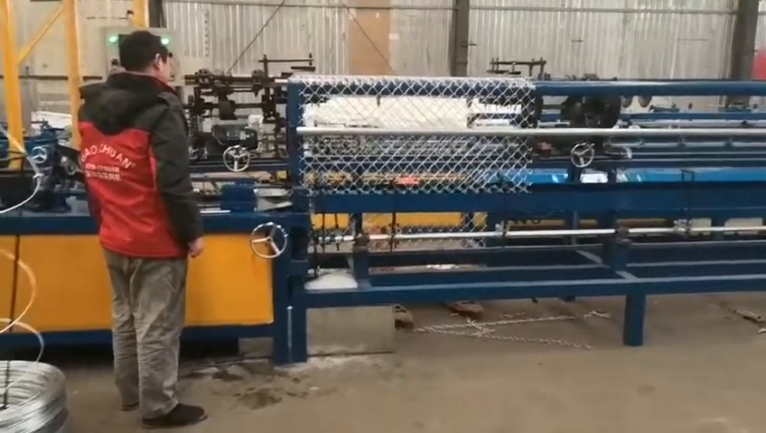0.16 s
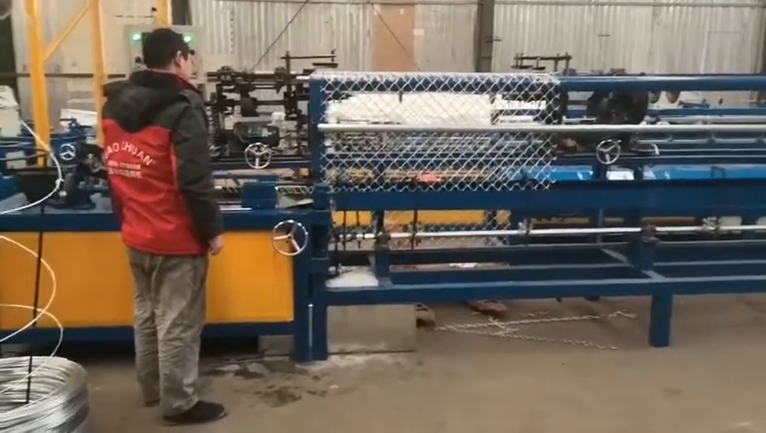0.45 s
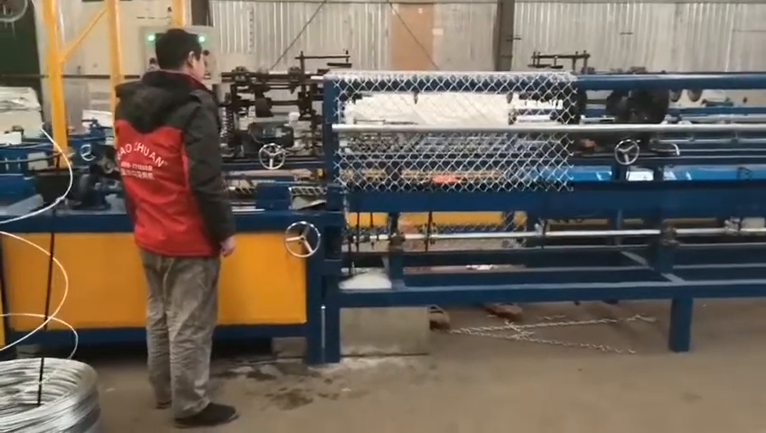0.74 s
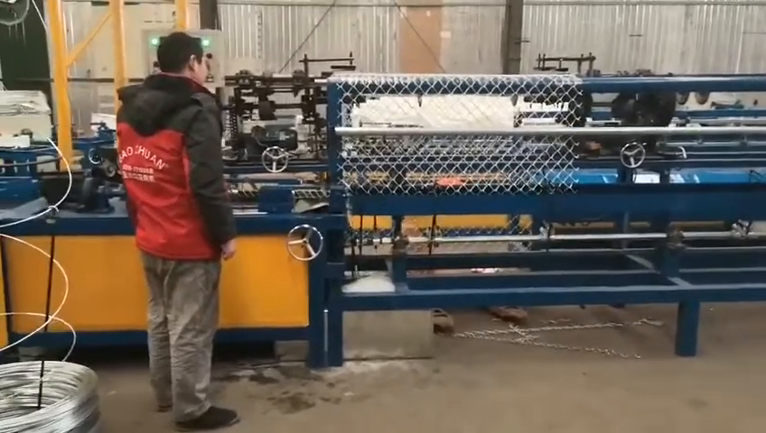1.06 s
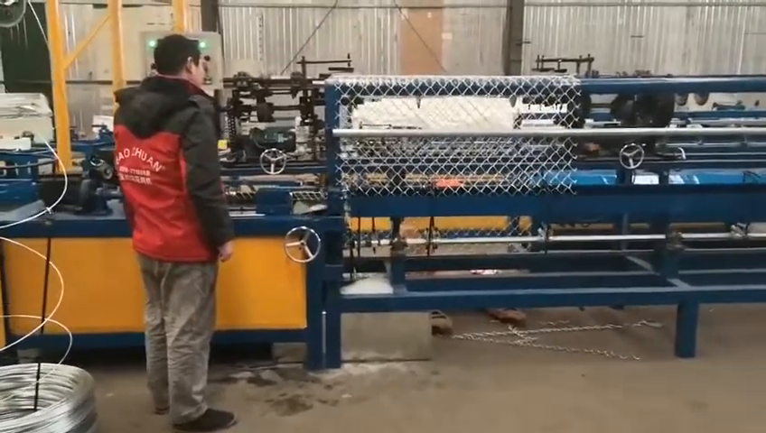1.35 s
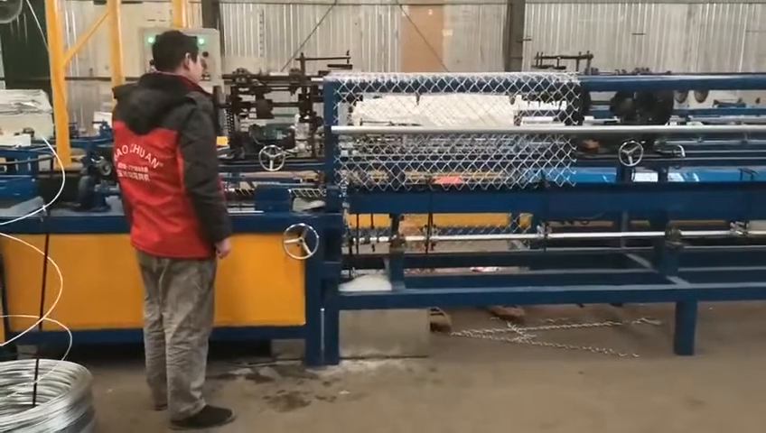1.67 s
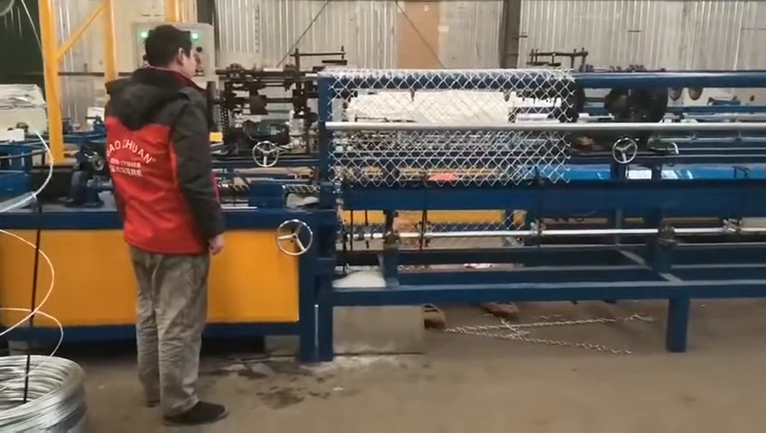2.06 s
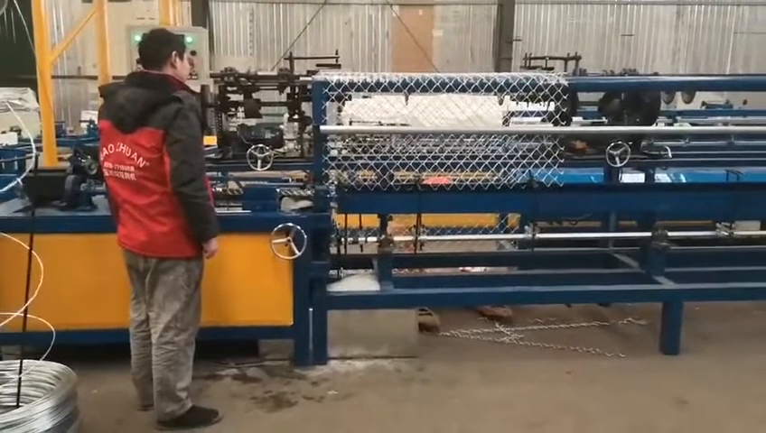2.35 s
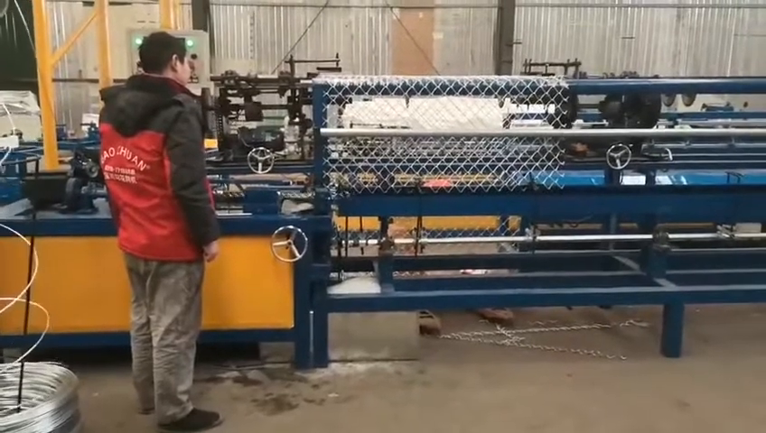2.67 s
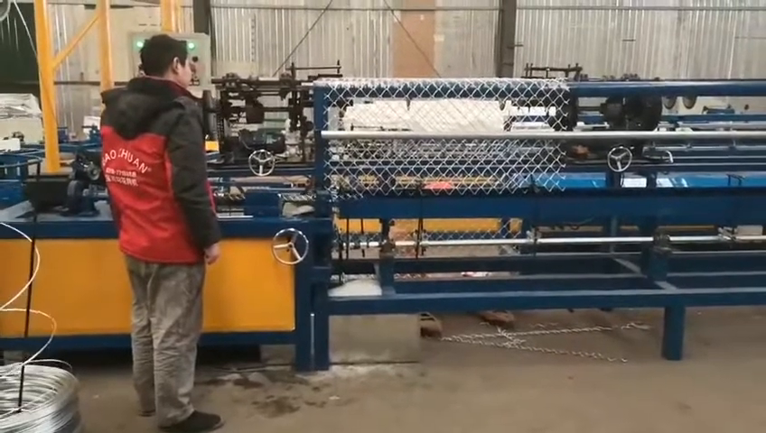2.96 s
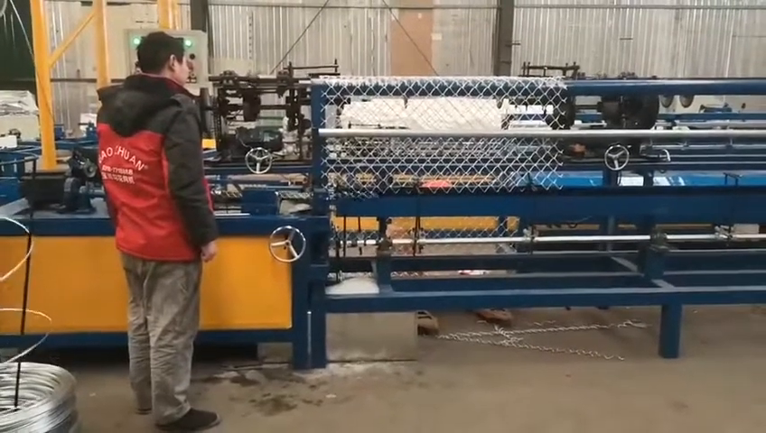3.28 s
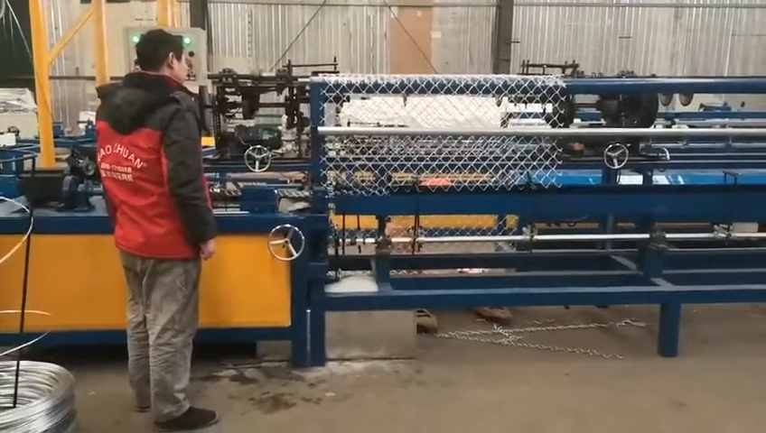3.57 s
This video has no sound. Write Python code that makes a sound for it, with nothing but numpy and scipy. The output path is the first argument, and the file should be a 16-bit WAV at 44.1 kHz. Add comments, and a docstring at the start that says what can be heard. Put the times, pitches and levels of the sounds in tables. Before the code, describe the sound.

A wire fence weaving machine hisses and rattles, slams once heavily, then hums and clanks.

```python
"""A large sheet-metal workshop, a few metres from a chain-link weaving machine, on a two-port microphone.
Air and wire guides hiss (shaped noise), shafts rumble and roar (noise bands) over steady motor tones.
Wires sing on the guides as sagging tones and loose parts rattle in the frame as ticks into resonances.
A heavy part slams and rebounds, and the hall rings on, each band dying at its own pace; after the slam
a gear hum glides up to speed as the drive starts, and a steel part clanks as chatter into its modes."""
import sys
import numpy as np
from scipy import signal
from scipy.fft import rfft, irfft
from scipy.io import wavfile

SR = 44100
rng = np.random.default_rng(int(sys.argv[2]) if len(sys.argv) > 2 else 0)


def inscribe(sig):
    """Save sig as 16-bit PCM at rate SR to the path in sys.argv[1].

    A 1-D sig is mono; a 2-D sig holds one channel per row.
    Samples are clipped to [-1, 1] before scaling.
    """
    pcm = np.round(np.clip(np.atleast_2d(sig).T, -1, 1) * 32767)
    wavfile.write(sys.argv[1], SR, pcm.astype(np.int16))


N = 164052  # length [samples]

# colour of the guides' hiss, also of the slam's crack: (pitch [Hz], density [dB per Hz])
HISS_COLOUR = [(2800, -4), (3300, -8), (3680, -3.5), (4790, -5.5), (5820, -2), (6730, -7.5), (7800, -2),
               (8400, -10), (9600, -14.5)]
# machine at work, before the lifts in rattle() and roar(): (time [s], rattle level [dB], low roar level [dB])
WORK_LEVELS = [(0, -22, -38), (.12, -27.5, -37.5), (1.2, -26.5, -39), (1.55, -27.5, -44.5),
               (1.85, -26.5, -43), (2.08, -24, -38.5), (2.6, -24.5, -40.5), (2.66, -24.5, -33.5),
               (2.85, -22, -39.5), (3.25, -23, -36.5), (3.41, -25.5, -40), (3.5, -20, -35.5),
               (3.72, -23, -36)]


def amp(db):
    """Decibels to amplitude factor."""
    return 10 ** (np.asarray(db) / 20)


def rms_one(x):
    """Scales a signal to rms 1."""
    return x / np.sqrt(np.mean(x ** 2) + 1e-20)


def seconds():
    """Time of every sample [s]."""
    return np.arange(N) / SR


def in_time(rows):
    """Draws each column of a timed table as a curve over the whole scene."""
    times, *columns = np.transpose(rows)
    return [np.interp(seconds(), times, column) for column in columns]


def at_hz(points, hz):
    """Reads a table at any pitch, straight between points on a log pitch axis."""
    pitches, values = np.array(points).T
    return np.interp(np.log(hz), np.log(pitches), values)


def drift(rate_hz):
    """Slow chance of rms 1: noise through two equal low-pass poles at rate_hz."""
    step = 40  # samples between drawn values
    r = np.exp(-2 * np.pi * rate_hz * step / SR)
    noise = rng.standard_normal(N // step + 2002)
    slow = signal.lfilter([1], [1, -2 * r, r * r], noise)[2000:]  # drop the filter's settling
    return np.interp(np.arange(N) / step, np.arange(len(slow)), rms_one(slow))


def resonance(x, hz, width_hz):
    """Two-pole resonance, gain about 1 on top."""
    r = np.exp(-np.pi * width_hz / SR)
    poles = [1, -2 * r * np.cos(2 * np.pi * hz / SR), r * r]
    return signal.lfilter([(1 - r * r) / 2, 0, (r * r - 1) / 2], poles, x + 1e-18)


def coloured(x, spectrum):
    """Gives a signal the colour of a spectrum table, falling off steeply beyond its ends."""
    hz = np.maximum(np.fft.rfftfreq(N, 1 / SR), 1)
    above_low_end = 1 / (1 + (spectrum[0][0] / hz) ** 12)
    below_high_end = 1 / (1 + (hz / spectrum[-1][0]) ** 12)
    return irfft(rfft(x) * amp(at_hz(spectrum, hz)) * above_low_end * below_high_end, N)


def banded_noise(spectrum, flicker_db, shape=lambda hz: 1):
    """Flickering stereo noise in half-octave bands, scaled for rms 1 before each band's envelope."""
    # how alike the two ports hear: (pitch [Hz], left-right likeness [-1 to 1])
    likeness = [(60, .999), (160, .97), (270, 0.9), (440, 0.2), (600, 0.32), (1200, 0.06), (2000, 0.25)]
    edges = 20 * 2 ** np.arange(0, 10, .5)
    edges = edges[(edges > spectrum[0][0] / np.sqrt(3)) & (edges < spectrum[-1][0] * np.sqrt(3))]
    white = coloured(rng.standard_normal((2, 2, N)), spectrum)
    shared_drift = drift(12.8)
    out, power = 0, 0
    for k, (low, high) in enumerate(zip(edges, edges[1:])):
        band_pass = signal.butter(2, [low, high], "band", fs=SR, output="sos")
        mid, side = signal.sosfilt(band_pass, white[k % 2])  # neighbours use different noise
        hz = np.sqrt(low * high)
        alike = np.clip(at_hz(likeness, hz), -1, 1)
        stereo = np.sqrt(1 + alike) * mid + np.sqrt(1 - alike) * side * [[1], [-1]]
        # the level flickers within twice flicker_db, partly together with the other bands
        flicker = np.tanh(shared_drift / 2 + drift(14.0) / 2) * 2
        band = amp(flicker_db * flicker) * stereo
        out = out + band * shape(hz)
        power = power + np.mean(band ** 2)
    return out / np.sqrt(power)


def motor():
    """Steady low tones whose levels waver a little."""
    # steady motor tones: (pitch [Hz], level [dB] about which each wavers)
    motor_lines = [(50, -47), (120, -45), (175, -43)]
    out = 0
    for hz, db in motor_lines:
        level = amp(db + 1.0 * drift(3.2))
        out = out + level * np.sqrt(2) * np.sin(2 * np.pi * hz * seconds())
    return out


def rumble():
    """Shafts rumble: low noise bands with a slow course of level."""
    # colour of the rumble: (pitch [Hz], density [dB per Hz])
    rumble_colour = [(22, 5), (36, -18), (50, -4.5), (75, -5), (134, -3), (183, -2), (230, -4), (320, -7.5)]
    # its course before a 2 dB lift: (time [s], level [dB])
    rumble_level = [(0, -37.5), (1.6, -37), (2.2, -33), (3.72, -36)]
    return amp(in_time(rumble_level)[0] + 2.0) * banded_noise(rumble_colour, flicker_db=1.04)


def air():
    """Faint top of the hiss: shaped noise whose level drifts."""
    # colour of the faint top: (pitch [Hz], density [dB per Hz])
    air_colour = [(9600, -20), (11000, 0.5), (12000, -8), (16000, -7)]
    # course about which it drifts: (time [s], level [dB])
    air_level = [(0, -46.5), (3.72, -53)]
    noise = rms_one(coloured(rng.standard_normal((2, N)), air_colour))
    return amp(in_time(air_level)[0] + 1.2 * drift(7.0)) * noise


def hiss():
    """Air and wire guides hiss: flickering treble noise bands."""
    # course of the treble hiss: (time [s], level [dB])
    hiss_level = [(0, -24.5), (1.3, -25), (1.9, -23.5), (2.5, -22), (3.1, -24), (3.43, -24.5), (3.72, -24)]
    return amp(in_time(hiss_level)[0]) * banded_noise(HISS_COLOUR, flicker_db=1.22)


def roar():
    """Low roar of the machine at work: flickering noise bands."""
    # colour of the roar: (pitch [Hz], density [dB per Hz])
    roar_colour = [(260, -4.5), (390, -5.5), (590, -14.5), (950, -4), (1250, -3.5)]
    _, roar_db = in_time(WORK_LEVELS)
    return amp(roar_db + 6) * banded_noise(roar_colour, flicker_db=2.0)


def hum():
    """Gear mesh tone gliding exponentially up to speed, with a rough skirt of resonant noise."""
    # course of the tone: (time [s], level [dB])
    hum_level = [(1.75, -64), (1.86, -34), (1.97, -28.5), (2.04, -30), (2.09, -19), (2.13, -28),
                 (2.38, -25.5), (2.71, -29), (2.75, -17), (2.79, -33), (2.97, -23), (3.02, -30),
                 (3.06, -21.5), (3.16, -26.5), (3.27, -23.5), (3.35, -29), (3.6, -24.5), (3.72, -29)]
    full_hz, start_hz, start_s, run_up_s = 230, 201.8, 1.8, 0.0996
    rough_db, rough_hz, rough_width_hz = -5, 226, 50  # level against the tone; width of each of two passes
    t = seconds()
    hz = full_hz - (full_hz - start_hz) * np.exp(-np.maximum(t - start_s, 0) / run_up_s)
    tone = np.sqrt(2) * np.sin(2 * np.pi * np.cumsum(hz) / SR)
    rough = resonance(rng.standard_normal(N), rough_hz, rough_width_hz)
    rough = rms_one(resonance(rough, rough_hz, rough_width_hz))
    sounding = t > hum_level[0][0]
    return amp(in_time(hum_level)[0]) * (tone + amp(rough_db) * rough) * sounding


def singing():
    """Wires on the guides swell and fade on sagging tones; the rough skirt differs at each port."""
    # each wire's song: (start time [s], length [s], level [dB] at full swell)
    songs = [(0, 0.1, -29), (0, 0.67, -39), (.85, 0.323, -32), (0.95, 0.392, -30.5), (1.1, 0.29, -34.5),
             (1.382, 0.76, -30.5), (2.15, 0.2, -35.5), (1.93, 0.23, -25.5), (2.2, 0.53, -31.5),
             (1.86, 0.1, -28), (2.351, 0.38, -32.5), (2.4, 0.57, -28.5), (2.429, 0.18, -28),
             (2.549, 0.69, -34), (2.72, .12, -29), (2.76, 0.3, -32.5), (2.76, 0.091, -24.5),
             (2.85, 0.54, -31), (2.852, 0.14, -28.5), (3.08, 0.19, -26), (3.08, 0.29, -27),
             (3.05, 0.25, -28), (3.05, 0.46, -28), (3.24, 0.11, -28), (3.481, 0.17, -27), (3.55, 0.18, -30),
             (3.5, 0.22, -32)]
    # pitch of each song halfway through, in the same order: one column (pitch [Hz])
    song_pitches = [1492, 7715, 1550, 1425, 2060, 1428, 1990, 2004, 1403, 1420, 1812, 2107, 1975, 1243,
                    2205, 2045, 1925, 1765, 2415, 1915, 2030, 2195, 1495, 2425, 1910, 2035, 2180]
    width_hz, rough_db, sag_hz_per_s = 26, -1.5, 35
    peak_at = 0.55  # share of the length; full swell spans from half this to halfway through the rest
    r = np.exp(-np.pi * width_hz / SR)
    out, t = np.zeros((2, N)), seconds()
    for hz, (start, length, db) in zip(song_pitches, songs):
        part = slice(int(start * SR), min(int((start + length) * SR), N))
        u = (t[part] - start) / length  # 0 to 1 through the song
        ramp = np.minimum(u / peak_at, (1 - u) / (1 - peak_at))
        swell = np.sin(np.pi / 2 * np.clip(ramp * 2, 0, 1))
        slow = signal.lfilter([1], [1, -2 * r, r * r], rng.standard_normal((2, 2, SR)))
        in_phase, across = rms_one(slow)[..., -len(u):]
        phase = 2 * np.pi * np.cumsum(hz - sag_hz_per_s * length * (u - .5)) / SR
        rough = in_phase * np.sin(phase) + across * np.cos(phase)
        tone = np.sqrt(2) * np.sin(phase) + amp(rough_db) * rough
        out[:, part] += amp(db) * swell * rms_one(tone)
    return out


def clanks():
    """A short dying chatter drives the modes of a steel part, with a dull crack and a hall tail."""
    # blows: (time [s], chatter decay [s], low, middle and high mode drive [dB])
    blows = [(3.161, 0.02, -26.5, -26.5, -26.5), (3.222, 0.015, -31, -28, -26.5),
             (3.329, 0.0094, -22.5, -34, -23.5), (3.454, 0.032, -26, -26.5, -26),
             (3.484, 0.051, -31.5, -31, -29), (3.563, 0.02, -27, -30, -34), (3.615, 0.012, -36, -30, -29.5),
             (3.632, .01, -24.5, -32, -23), (3.643, 0.0067, -20, -15, -21.5)]
    # low, middle and high modes of the part, each a list of: (pitch [Hz], width [Hz], relative level [dB])
    steel_modes = [
        [(3660, 110, 0), (3815, 90, -5)],
        [(4700, 600, -5), (5680, 400, 0)],
        [(6830, 330, 0), (7470, 280, -3), (7900, 280, -3)],
    ]
    crack_db, hall_db, hall_t60_s = 1, -12, 0.6
    detune, attack_s = .006, .001  # each mode rings a little off pitch at each blow (spread as a share)
    crack_hz, crack_width_hz = 5100, 3400
    out, t = np.zeros((2, N)), seconds()
    for start, length, *group_db in blows:
        first = int(start * SR)
        part = slice(first, min(first + SR // 2, N))
        age = t[part] - start
        chatter = np.exp(-age / max(length, .002))
        hall = amp(hall_db - 60 * age / hall_t60_s) * (1 - np.exp(-age / 0.0019))
        burst = rng.standard_normal((2, SR // 2))[:, :len(age)]
        burst = burst * (chatter + hall) * np.minimum(age / attack_s, 1)
        crack = resonance(resonance(burst, crack_hz, crack_width_hz), crack_hz, crack_width_hz)
        out[:, part] += amp(crack_db + np.mean(group_db)) * crack
        for db, modes in zip(group_db, steel_modes):
            for hz, width_hz, level_db in modes:
                hz = hz * (1 + detune * rng.standard_normal())
                ring = resonance(resonance(burst, hz, width_hz), hz, 3 * width_hz)
                # narrow modes let less noise through, so they are raised
                out[:, part] += amp(db + level_db) * ring * np.sqrt(SR / width_hz)
    return out


def rattle():
    """Loose parts: dense uneven ticks of wire on steel ring frame modes, over a smooth reverberant part."""
    # colour of the rattle: (pitch [Hz], density [dB per Hz])
    rattle_colour = [(750, -36), (1150, -9), (1440, 2.5), (1780, -1), (2100, 2), (2700, -0.5), (3500, -4.5)]
    ticks_per_s, mode_q, spread_db = 900, 88, 2
    ticks_db, smooth_db = -4, -3  # shares of the two parts
    heights = amp(spread_db * np.minimum(rng.exponential(1, (2, N)), 5))
    ticks = heights * rng.choice([-1, 1], (2, N))
    ticks = ticks * (rng.random((2, N)) < ticks_per_s / SR)
    pitches = np.geomspace(800, 3400, num=24)
    mode_hit = rng.integers(0, 24, (2, N))  # each tick strikes one mode
    rings = sum(resonance(ticks * (mode_hit == k), hz, hz / mode_q) for k, hz in enumerate(pitches))
    ringing = amp(ticks_db) * rms_one(coloured(rings, rattle_colour))
    smooth = amp(smooth_db) * banded_noise(rattle_colour, flicker_db=1.2)
    rattle_db, _ = in_time(WORK_LEVELS)
    return amp(rattle_db + 2.0) * (ringing + smooth)


def slam():
    """A heavy blow with a bright crack, then rebounds; each noise band dies at the hall's own pace."""
    # colour of the blow: (pitch [Hz], density [dB per Hz])
    slam_colour = [(45, -4), (121, 4.5), (377, -10), (554, -16), (933, -3), (1400, -4), (2160, -3.5),
                   (3300, -8.5), (5000, -24.5)]
    # the blow and its rebounds: (time [s], relative level [dB])
    slam_blows = [(0.623, 2), (.745, -4.5), (.8, -5.5), (.86, -7)]
    # ring of the hall: (pitch [Hz], time to fall by 60 dB [s])
    hall_t60 = [(50, 0.4), (200, 0.9), (600, 1.8), (1500, 1.12), (3000, 0.92), (8000, 0.37)]
    body_db, crack_db, crack_decay_s = -14, -20, 0.022
    attack_s, attack_cycles = 0.0046, 2.5  # the cycles make the lows build up later
    ages = [(np.maximum(seconds() - start, 0), db) for start, db in slam_blows]

    def ring_on(hz):
        """Envelope of one band: the powers of all blows added."""
        power = 0
        for age, db in ages:
            attack = np.minimum(age / (attack_s + attack_cycles / hz), 1)
            decay = amp(db - 60 * age / at_hz(hall_t60, hz))
            power = power + (attack * decay) ** 2
        return np.sqrt(power)

    body = banded_noise(slam_colour, flicker_db=1.5, shape=ring_on)
    first_age = ages[0][0]
    crack = rms_one(coloured(rng.standard_normal((2, N)), HISS_COLOUR))
    crack = crack * (first_age > 0) * np.exp(-first_age / crack_decay_s)
    return amp(body_db) * body + amp(crack_db) * crack


def scene():
    """All sources added, from the background to the machine's slam."""
    background = motor() + rumble() + air() + hiss() + roar()
    return background + hum() + singing() + clanks() + rattle() + slam()


def record(dry):
    """The two microphone ports colour and delay the sound differently; peaks are rounded, the top is cut."""
    # difference between the ports: (pitch [Hz], left minus right level [dB])
    port_difference = [(270, 0.5), (440, -2.5), (730, 8), (1120, -1.5), (1610, -5.5), (3350, -7.5),
                       (5300, -9.5), (6500, 0), (8000, 7), (9700, 0)]
    lag_s, lag_hz = .00045, 400  # the right port hears later, mostly above this pitch
    cutoff_hz = 15100
    hz = np.maximum(np.fft.rfftfreq(N, 1 / SR), 1)
    half_db = at_hz(port_difference, hz) / 2
    late = np.exp(-2j * np.pi * hz * lag_s / (1 + (lag_hz / hz) ** 2))
    ports = irfft(rfft(dry) * amp([half_db, -half_db]) * [late ** 0, late], N)
    rounded = np.tanh(ports * .8) / .8
    return signal.sosfilt(signal.ellip(14, .5, 80, cutoff_hz, fs=SR, output="sos"), rounded)


dry = scene()
out = record(dry)
inscribe(out)
```